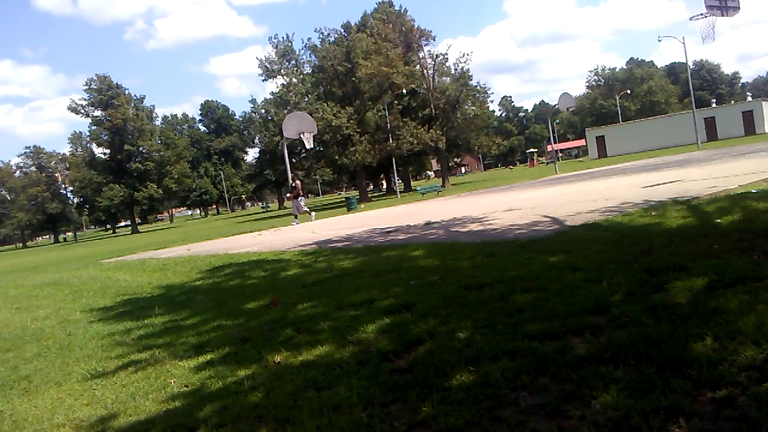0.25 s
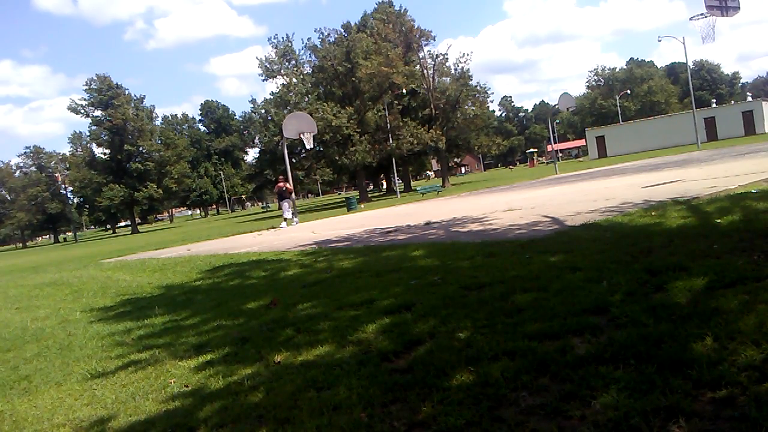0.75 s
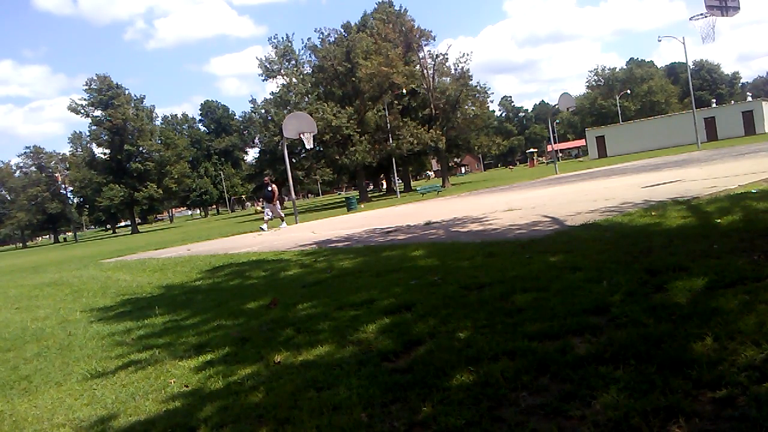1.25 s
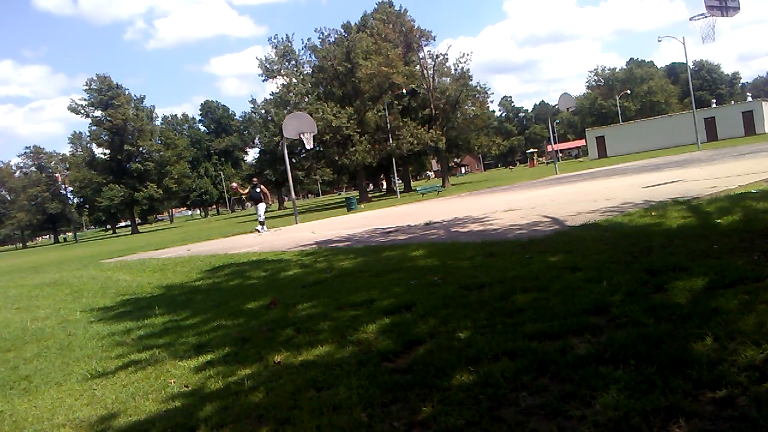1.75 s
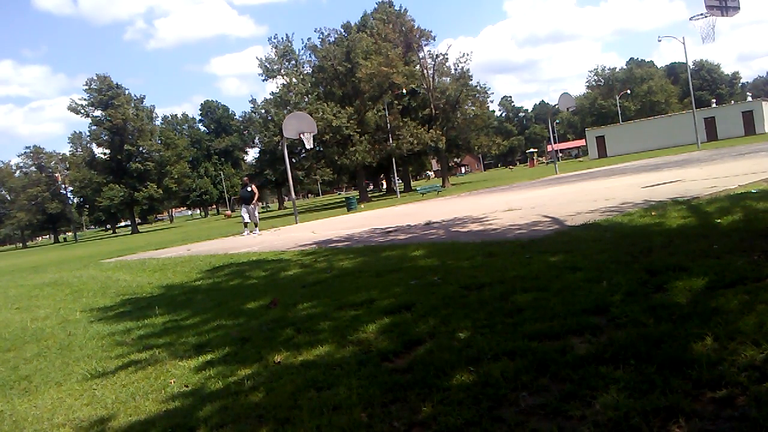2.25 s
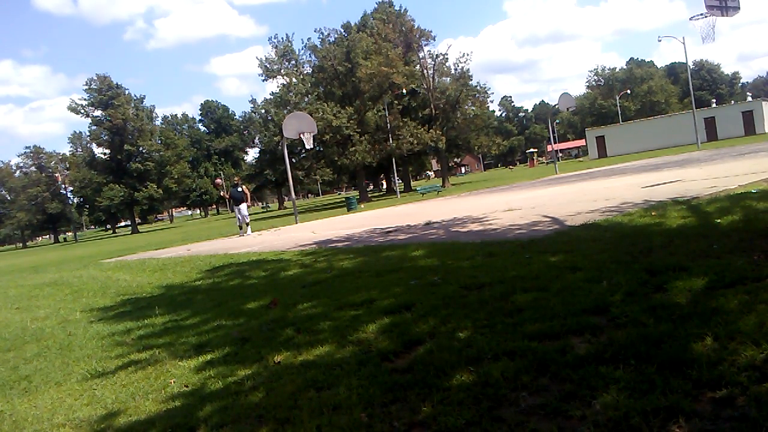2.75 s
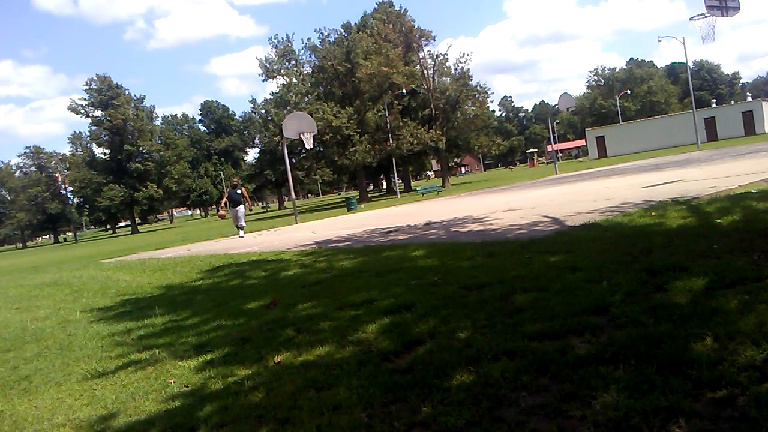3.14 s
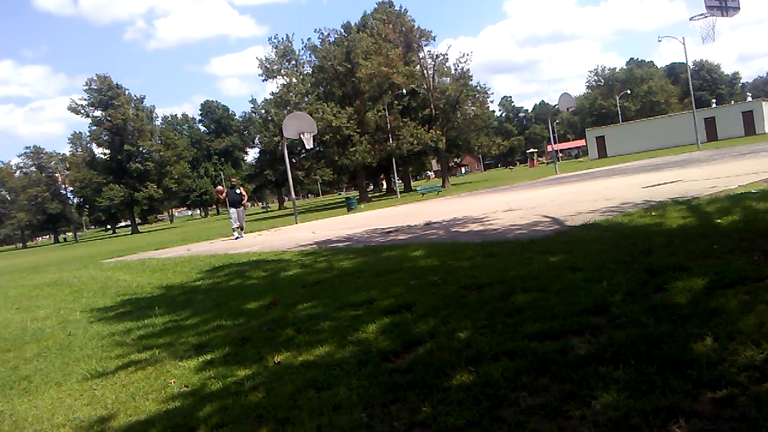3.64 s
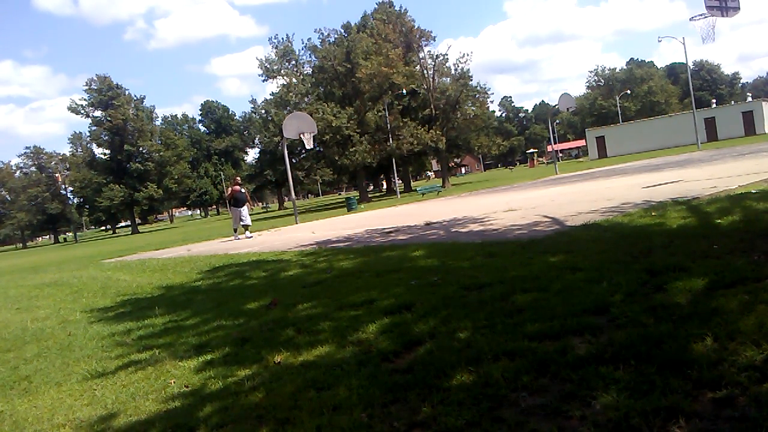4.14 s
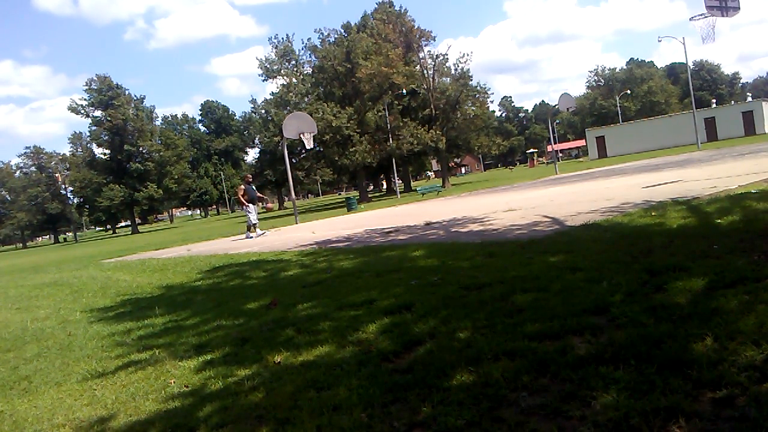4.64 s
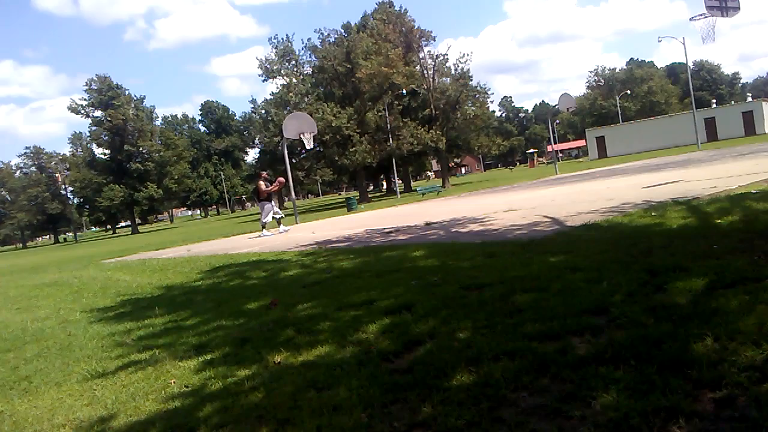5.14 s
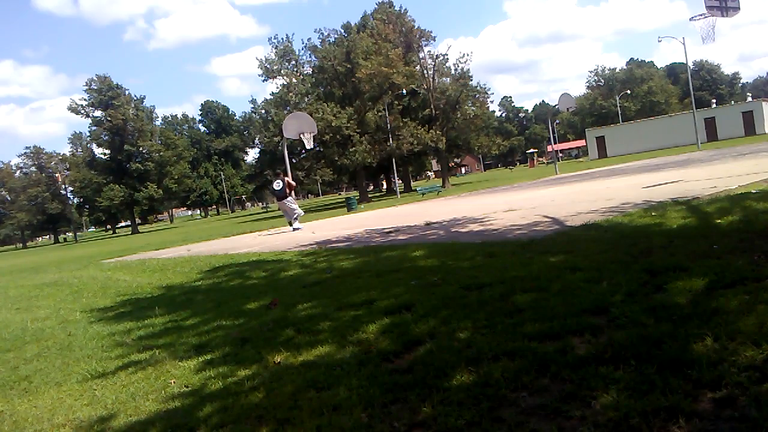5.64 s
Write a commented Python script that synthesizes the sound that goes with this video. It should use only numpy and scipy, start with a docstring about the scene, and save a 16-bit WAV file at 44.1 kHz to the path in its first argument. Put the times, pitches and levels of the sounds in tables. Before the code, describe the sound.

The scene is an open park with a low wind rumble on the microphone, a soft hiss of leaves and a faint hum of far traffic. Some way off, a basketball bounces on concrete four times, at about 1.4, 2.4, 3.5 and 4.7 seconds. Each bounce is a sharp slap with a small thump, a slight hollow ping and a short echo; the first is a little duller. Cicadas buzz faintly in the trees, pulsing most clearly between 2 and 4.5 seconds and fading near the end, while a tiny insect chirps very high and quietly. The wind is light at first, with small gusts around 2 seconds. From about 3.6 seconds it becomes the loudest sound, buffeting the microphone with deep thumps, notably near 3.8 and 5.3 seconds, and continuing until the end at about 6 seconds.

```python
"""Outdoor concrete court. A basketball is dribbled four times some way off: the rubber slaps, the shell
thumps, the air inside pings, and trees and a building throw each bounce back. Wind rumbles on the
microphone and buffets it harder in the second half. Cicadas pulse their tymbals in the hissing trees,
a small insect chirps high in the grass and far traffic hums."""
import sys
import numpy as np
from scipy import signal
from scipy.fft import rfft, irfft, next_fast_len
from scipy.io import wavfile
from scipy.ndimage import uniform_filter1d

SR = 44100
rng = np.random.default_rng(int(sys.argv[2]) if len(sys.argv) > 2 else 0)


def int16_out(signal):
    """Quantize to a 16-bit WAV file."""
    q = np.round(np.clip(np.atleast_2d(signal).T, -1, 1) * 32767)
    wavfile.write(sys.argv[1], SR, q.astype(np.int16))


N = 259737
TIME = np.arange(N) / SR


def undb(db):
    """Decibels to gain."""
    return 10 ** (np.asarray(db) / 20)


def unit(x):
    """Scale to rms 1."""
    return x / np.sqrt(np.mean(x ** 2))


def curve(table):
    """A (t/s, value) table interpolated at every sample."""
    return np.interp(TIME, *np.transpose(table))


def add(track, at_s, sound):
    """Mix a sound into the track."""
    start = max(int(at_s * SR), 0)
    track[start:start + len(sound)] += sound[:max(N - start, 0)]


def gains(spectrum, size):
    """Gain of a (f/Hz, level/dB) spectrum at each FFT bin."""
    hz, db = np.transpose(spectrum)
    bins_hz = np.maximum(np.fft.rfftfreq(size, 1 / SR), 1)
    return undb(np.interp(np.log(bins_hz), np.log(hz), db))


def noise(spectrum, size=N):
    """Coloured noise, rms 1."""
    padded = next_fast_len(size)
    white = rfft(rng.standard_normal(padded))
    return unit(irfft(white * gains(spectrum, padded), padded)[:size])


def click(spectrum, size=512):
    """Minimum-phase pulse with the given spectrum."""
    cepstrum = irfft(np.log(gains(spectrum, size)))[:size // 2]
    cepstrum[1:] *= 2
    return irfft(np.exp(rfft(cepstrum, size)))


def lowpass(x, hz, order=2):
    """Butterworth low-pass."""
    return signal.sosfilt(signal.butter(order, min(hz, SR / 2 - 1000), fs=SR, output="sos"), x)


def band(hz, width_hz):
    """Noise band whose centre may move, rms 1."""
    phase = 2 * np.pi * np.cumsum(hz + np.zeros(N)) / SR
    i, q = lowpass(rng.standard_normal((2, N)), width_hz / 2, order=3)
    return unit(i * np.cos(phase) + q * np.sin(phase))


def drift(rate_hz):
    """Smooth random drift, rms 1."""
    step = int(SR / rate_hz)
    stairs = np.repeat(rng.standard_normal(N // step + 1), step)
    return unit(uniform_filter1d(stairs, step)[:N])


def steady(x, window_s):
    """Even out the slow swings of a noise."""
    return x / np.sqrt(uniform_filter1d(x ** 2, int(window_s * SR)) + 1e-9)


def ring(modes, t, detune=0, uneven_db=0):
    """Damped modes of alternating sign, with optional random spread of pitch and level."""
    out = 0
    for k, (hz, db, t60_s) in enumerate(modes):
        level_draw, pitch_draw = rng.standard_normal(2)
        envelope = undb(db + uneven_db * level_draw - 60 * t / t60_s)
        out += (-1) ** (k + 1) * envelope * np.sin(2 * np.pi * hz * (1 + detune * pitch_draw) * t)
    return out


def resonate(x, hz, q):
    """Resonant band-pass, unity gain at the peak."""
    return signal.lfilter(*signal.iirpeak(hz, q, fs=SR), x)


def smear(x, hz, width_hz, depth=2):
    """A resonance takes up part of a pulse and returns it late; depth 2 is all-pass."""
    return x - depth * resonate(x, hz, hz / width_hz)


def leaves(level_db=-60, rise_db_per_s=0.35, flutter_db=1.5):
    """Soft hiss of the trees, growing a little as the wind freshens."""
    spectrum = [(300, 7), (1000, 6.5), (1400, 4), (1900, 2.5), (2600, 4), (3400, 2), (4500, -5),
                (6000, -5.5), (9000, -12.5), (11000, -15), (16000, -17)]  # leaf hiss: f/Hz, level/dB
    return undb(level_db + rise_db_per_s * TIME + flutter_db * drift(6.9)) * noise(spectrum)


def traffic(road_db=-49.5, hum_db=-2, width_hz=13):
    """Blurred engine tones come and go over steady, low road noise."""
    tones = [(98.2, -46.5, 1, 4.6), (192.8, -52, 1.23, 0.91), (385.6, -58.5, 4.35, 1.06),
             (522, -60, 1.73, 0.5), (563, -62, 1.16, 0.34), (624, -65, 1.14, 0.37), (671, -69, 1.2, 1.3),
             (763, -67.5, 4.3, 3.5), (870, -65, 0.98, 0.29)]  # far engines: f/Hz, level/dB, peak t/s, swell half-width/s
    road = [(30, -22), (60, -1.5), (110, 3.5), (200, 1), (300, -8), (500, -14.5), (800, -20), (1200, -40.5),
            (2500, -49.5)]  # road noise: f/Hz, level/dB
    hum = 0
    for hz, db, peak_s, span_s in tones:
        swell = 1 / np.sqrt(1 + ((TIME - peak_s) / span_s) ** 4)
        hum += swell * undb(db) * band(hz, width_hz)
    return undb(hum_db) * hum + undb(road_db) * noise(road)


def grass_insect(hz=9850, width_hz=480, sigma_s=0.017, gain_db=-2, stroke_hz=105):
    """Short, very high chirps of a few wing strokes each, evenly spaced within a bout."""
    bouts = [(.115, .76, .26, -64.5), (1.02, 1.39, .245, -64.5), (2.095, 2.46, .24, -65),
             (3.8, 5.63, .281, -63.5)]  # chirping: start/s, end/s, period/s, level/dB
    envelope = 0
    for start_s, end_s, period_s, db in bouts:
        for at_s in np.arange(start_s, end_s, period_s):
            t = TIME - at_s
            strokes = np.cos(np.pi * stroke_hz * t) ** 2
            envelope += undb(db) * np.exp(-(t / sigma_s) ** 2 / 2) * unit(strokes)
    return undb(gain_db) * envelope * band(hz, width_hz)


def cicada_rhythm(first_s=0.127, rate_hz=10.9, hurry_s=2.14, hurry_hz_per_s=1.15):
    """Even pulses that then hurry: added rate, place in the cycle and pulse shape (both -0.5 to 0.5)."""
    hurry_hz = hurry_hz_per_s * np.maximum(TIME - hurry_s, 0)
    count = np.cumsum(rate_hz + hurry_hz) / SR - first_s * rate_hz
    cycle = (count + 0.5) % 1 - 0.5
    return hurry_hz, cycle, np.cos(2 * np.pi * cycle) / 2


def far_cicadas(flicker_db=1, attack_s=0.14, release_s=0.17):
    """Hissing chorus with single drones; the low ones throb between the near cicada's pulses."""
    spectrum = [(2800, -47), (3500, -1.5), (4000, -5), (4800, -4), (5600, -1), (6200, -1), (6800, -2),
                (7500, -4), (8200, -6.5), (9500, -9), (10500, -14.5), (15000, -24.5)]  # chorus colour: f/Hz, level/dB
    swell = [(0, -64), (.3, -63), (.7, -56.5), (1.1, -58.5), (2.1, -55.5), (3.2, -58.5), (4.7, -58),
             (5.2, -60.5), (5.89, -75)]  # chorus rise and fall: t/s, level/dB
    drones = [(1.9, 2.66, 4130, 600, -62.5, 11), (2.92, 3.7, 4100, 610, -61, 8.5),
              (3.9, 4.9, 3930, 310, -68.5, 10), (1.85, 3, 6780, 410, -61, -3),
              (3.4, 4.03, 6780, 1000, -61, -6)]  # single calls: start/s, end/s, f/Hz, width/Hz, level/dB, throb/dB
    out = undb(curve(swell) + flicker_db * drift(25.09)) * noise(spectrum)
    _, _, pulse = cicada_rhythm()
    for start_s, end_s, hz, width_hz, db, throb_db in drones:
        attack = np.exp(-np.maximum(start_s - TIME, 0) / attack_s)
        release = np.exp(-np.maximum(TIME - end_s, 0) / release_s)
        level_db = db - throb_db * pulse + flicker_db * drift(16)
        out += attack * release * undb(level_db) * band(hz, width_hz)
    return out


def near_cicada(buzz_hz=5400, sweep_hz=3100, abdomen_hz=6080, depth_db=10, uneven_db=-2,
                fade_s=5.43, fade_db_per_s=20):
    """Each pulse is a falling buzz plus a ring of the abdomen; the ring takes over as the pulses hurry."""
    effort = [(0.0, -70), (0.28, -76), (0.59, -67), (1.66, -66), (2.2, -53.5), (2.43, -65), (2.71, -62.5),
              (2.95, -57.5), (3.28, -61), (3.66, -55.5), (4.18, -62), (4.62, -60), (4.95, -65.5),
              (5.89, -77)]  # song strength: t/s, level/dB
    effort_db = curve(effort) - fade_db_per_s * np.maximum(TIME - fade_s, 0)
    hurry_hz, cycle, pulse = cicada_rhythm()
    buckle_hz = 390 + 10 * drift(13)
    tymbal = 1 + 0.25 * np.cos(2 * np.pi * np.cumsum(buckle_hz) / SR)
    buzz = band(buzz_hz - sweep_hz * cycle, width_hz=1350) * tymbal
    buzz *= undb(depth_db * pulse + uneven_db * drift(24))
    abdomen = band(abdomen_hz, width_hz=330) * undb(depth_db * pulse + uneven_db * drift(13))
    buzz_db, abdomen_db = 1 - 5 * hurry_hz, -1 + 0.8 * hurry_hz
    return undb(effort_db) * (undb(buzz_db) * unit(buzz) + undb(abdomen_db) * unit(abdomen))


def wind(gale_db=-2, crossover_db=-30, rise_s=0.053, fall_s=0.058):
    """Turbulence on the microphone port; gusts ride on a base wind, and the colour shifts with strength."""
    base = [(0, -63), (.5, -43), (1.2, -47.5), (1.5, -41), (3.25, -44), (3.55, -33.5), (3.85, -20.5),
            (4.2, -21), (4.55, -29), (5.75, -27), (5.89, -32.5)]  # freshening wind: t/s, level/dB
    gusts = [(.22, -49), (1.68, -37), (1.98, -33), (2.16, -28), (3.15, -36.5), (3.39, -29), (3.68, -24.5),
             (4.43, -23), (4.72, -20.5), (4.99, -19.5), (5.56, -22.5)]  # gust peaks: t/s, level/dB
    breeze = [(15, -37), (30, -37), (42, 7), (58, 4), (100, -1), (150, -16.5), (220, -21.5), (350, -38),
              (600, -48), (1100, -85)]  # light wind: f/Hz, level/dB
    gale = [(15, -56), (30, -12), (45, -7.5), (62, 7), (88, -0.5), (125, -6), (170, -11), (250, -29.5),
            (400, -35.5), (700, -52), (1500, -102)]  # strong wind: f/Hz, level/dB
    power = undb(curve(base)) ** 2
    for peak_s, db in gusts:
        width_s = np.where(TIME < peak_s, rise_s, fall_s)
        power += undb(db) ** 2 * np.exp(-((TIME - peak_s) / width_s) ** 2)
    gale_share = power / (power + undb(crossover_db) ** 2)
    light = np.sqrt(1 - gale_share) * steady(noise(breeze), window_s=0.0915)
    strong = np.sqrt(gale_share) * steady(noise(gale), window_s=0.0572)
    return np.sqrt(power) * (light + undb(gale_db) * strong)


def eddies(gain_db=-4.5):
    """Each eddy swings the pressure briefly, with low rumble and a faint hiss of microphone overload."""
    # eddies on the microphone: centre t/s, length/s, level/dB, swing f/Hz, rumble/dB re swing
    strikes = [(3.667, 0.0314, -21.5, 107.5, -6), (3.816, .036, -13.5, 91.6, -23),
               (4.128, 0.084, -21.5, 74, -3), (4.406, 0.051, -23.5, 93.6, -4),
               (4.444, 0.028, -19, 112, -10), (4.69, 0.062, -21, 85, -14.5), (4.73, 0.036, -18, 115, -15),
               (4.968, 0.091, -18, 56.8, -13.5), (5.275, 0.043, -11.5, 76.7, -12),
               (5.697, 0.071, -23.5, 113.2, -9)]
    spectrum = [(50, -28), (110, -7), (170, 5.5), (260, -2), (360, -12.5), (550, -23.5), (1000, -42.5),
                (2000, -45.5), (6000, -51), (10000, -58), (12500, -57), (16000, -65)]  # low wind rumble with faint overload hiss: f/Hz, level/dB
    out = np.zeros(N)
    for at_s, length_s, db, swing_hz, rumble_db in strikes:
        size = int(length_s * SR)
        window = np.hanning(size)
        swing = unit(np.sin(2 * np.pi * (swing_hz * TIME[:size] + rng.random())) * window)
        rumble = unit(noise(spectrum, size=SR // 2)[:size] * window)
        add(out, at_s - length_s / 2, undb(db + gain_db) * (swing + undb(rumble_db) * rumble))
    return out


def echoes(x):
    """Quick scatter around the court, a later return from the building, a thin tail from the trees."""
    scatter = [(100, -5), (300, -15), (600, 9.5), (1300, -2), (2800, 2), (4500, 0.5), (9000, 7.5),
               (16000, -8)]  # court and tree reflections: f/Hz, level/dB
    wall = [(300, -8), (900, 0), (1400, -0.5), (1900, -3), (2900, -2), (4000, -1.5), (9000, 4)]  # building reflection: f/Hz, level/dB
    # paths: spectrum, level/dB, delay/s, t60/s
    court = (scatter, -6, 0.0074, 0.08)
    building = (wall, -10, 0.066, 0.31)
    trees = (scatter, -11, 0.0074, 0.92)
    response = np.zeros(N)
    for spectrum, db, delay_s, t60_s in (court, building, trees):
        burst = unit(noise(spectrum, size=SR) * undb(-60 * TIME[:SR] / t60_s))
        spectrum_gain = np.sqrt(np.mean(gains(spectrum, SR) ** 2) / SR)
        add(response, delay_s, undb(db) * spectrum_gain * burst)
    return signal.fftconvolve(x, response[:SR])


def bounce(slap_db, thump_db, cutoff_hz, skin_hz, knock_hz, ping_db, ping_hz,
           click_db=1, grit_db=-35, grit_t60_s=0.069, knock_db=-2,
           favour_db=6, cavity_db=-41, flex_delay_s=0.00068):
    """A slap smeared by the skin, a crunch of grit, a ping of the air inside and a thump of the shell."""
    impact = [(250, 8.5), (550, -10.5), (900, -8.5), (1400, -0.5), (2200, -1), (3200, -0.5), (5000, -5),
              (7000, -14.5), (9000, -12), (11000, -20), (16000, -21)]  # rubber on concrete: f/Hz, level/dB
    cavity = [(1215, -11.5, 0.16), (1390, -3, 0.083), (1990, -13, 0.044), (2360, 2.5, 0.016),
              (2960, 1.5, 0.059)]  # air modes in the ball: f/Hz, level/dB, t60/s
    shell = [(116, 0.5, 0.037), (278, -3.5, 0.046), (430, -17, 0.041), (505, -17, 0.031)]  # flexing modes: f/Hz, level/dB, t60/s
    t = TIME[:SR // 4]
    slap = np.zeros(len(t))
    add(slap, 0, undb(click_db) * click(impact))
    slap = smear(slap, skin_hz, width_hz=900)
    slap = smear(slap, skin_hz, width_hz=460, depth=2.27)
    slap += undb(grit_db - 60 * t / grit_t60_s) * noise(impact, size=len(t))
    slap += undb(knock_db) * resonate(slap, knock_hz, q=4)  # hollow knock
    # the spot that lands drives the air mode near ping_hz harder
    modes = [(hz, db + favour_db * np.exp(-((hz - ping_hz) / 110) ** 2), t60_s)
             for hz, db, t60_s in cavity]
    ping = undb(cavity_db + ping_db) * ring(modes, t, detune=0.01, uneven_db=1.5)
    thump = ring(shell, np.maximum(t - flex_delay_s, 0))
    return undb(slap_db) * lowpass(slap + ping, cutoff_hz, order=6) + undb(thump_db) * thump


def dribble():
    """Four bounces; the player moves, so each has its own echoes."""
    # landings: t/s, slap/dB, thump/dB, cutoff/Hz, skin/Hz, knock/Hz, ping/dB, ping/Hz, echo/dB
    landings = [(1.3793, -3, -17.5, 3240, 3080, 1430, 1.5, 1380, 1.5),
                (2.376, 0, -14.5, 6400, 4120, 1900, 1.5, 1193, -1),
                (3.5019, 1, -14, 9300, 3600, 1420, -10, 1380, -0.5),
                (4.7421, 0, -20.5, 8960, 3870, 2780, -6, 1380, -1.5)]
    out = np.zeros(N)
    for at_s, *blow, echo_db in landings:
        direct = bounce(*blow)
        add(out, at_s, direct)
        add(out, at_s, undb(echo_db) * echoes(direct))
    return out


def scene():
    """Traffic, insects, wind and the ball, in mono."""
    background = leaves() + traffic() + grass_insect() + far_cicadas() + near_cicada()
    return (background + wind() + eddies() + dribble())[None]


def record(dry, low_hz=28, top_hz=15700):
    """The recorder cuts the deepest rumble and the top."""
    low_cut = signal.butter(2, low_hz, "high", fs=SR, output="sos")
    top_cut = signal.ellip(10, 0.2, 80, top_hz, fs=SR, output="sos")
    return signal.sosfilt(top_cut, signal.sosfilt(low_cut, dry))


dry = scene()
out = record(dry)
int16_out(out)
```